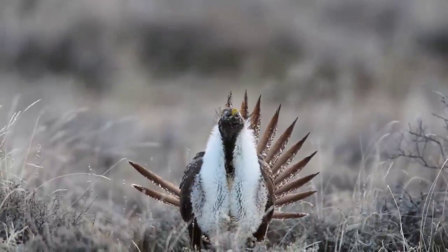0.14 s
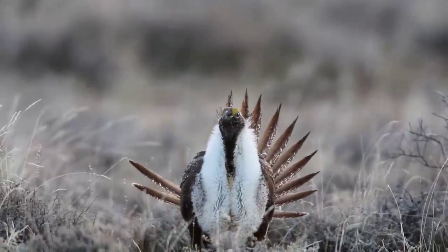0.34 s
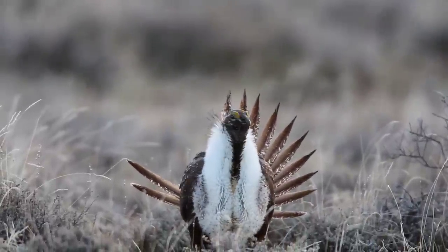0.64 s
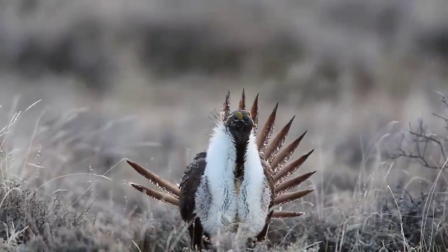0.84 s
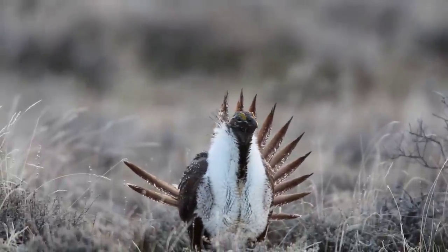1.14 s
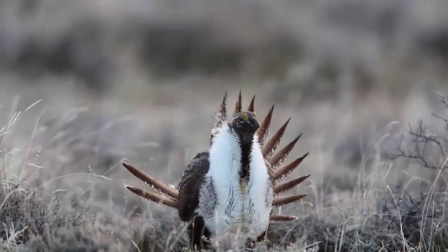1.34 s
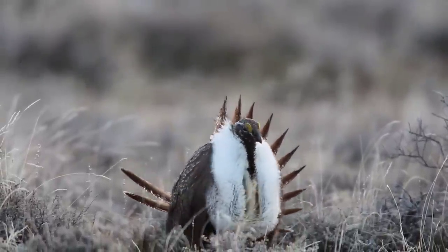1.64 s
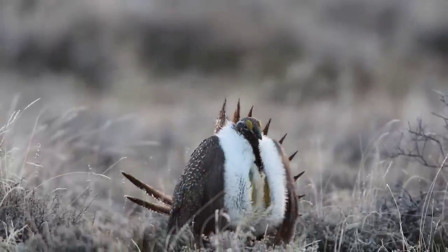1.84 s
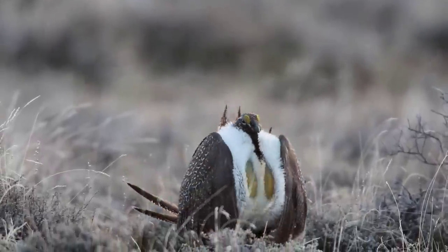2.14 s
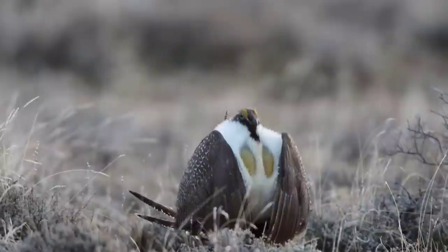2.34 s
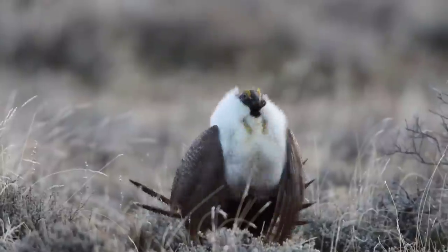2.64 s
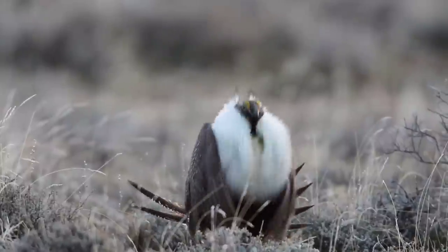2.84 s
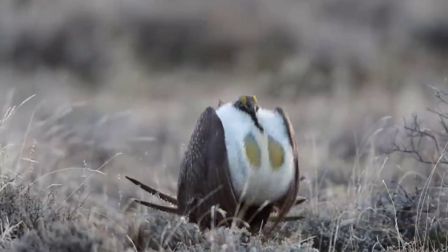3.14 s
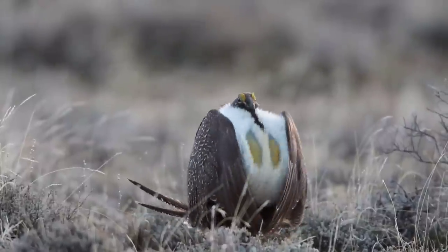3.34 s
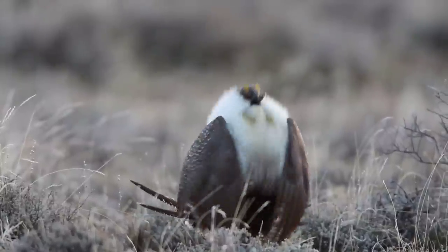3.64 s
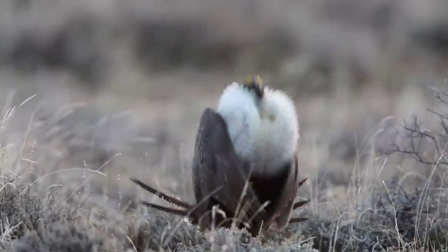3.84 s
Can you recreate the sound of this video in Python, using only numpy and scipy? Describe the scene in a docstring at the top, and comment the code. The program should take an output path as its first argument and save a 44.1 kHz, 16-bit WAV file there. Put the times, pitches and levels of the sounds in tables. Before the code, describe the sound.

A displaying grouse gives two hollow pops around a quick whistle, later feathery swishes and a rasp

```python
"""A pop, a quick whistle and another pop open the scene: a sage-grouse displays on open grassland.
Its air sacs are ringing modes and hollow sliding tones. Later its wings swish over the breast feathers as
dense noise grains, with two rising rasps of roughened tone and low sac throbs. A lark chirps far off in
gliding tones, wind rumbles as shaped noise, the camera mount is bumped and rattles, and the recorder hisses."""
import sys
import numpy as np
from scipy import signal
from scipy.fft import rfft, irfft
from scipy.io import wavfile
from scipy.ndimage import uniform_filter1d

SR = 44100
rng = np.random.default_rng(int(sys.argv[2]) if len(sys.argv) > 2 else 0)


def store_wav(level_fs):
    """Save 16-bit WAV to argv[1]."""
    pcm = np.round(np.clip(np.atleast_2d(level_fs), -1, 1) * 32767)
    wavfile.write(sys.argv[1], SR, pcm.T.astype(np.int16))


N = 176400  # four seconds of samples
TIME_S = np.arange(N) / SR


def amp(db):
    """Turn decibels into a gain."""
    return 10 ** (np.asarray(db) / 20)


def unit(x):
    """Scale a sound to an rms of 1."""
    return x / np.sqrt(np.mean(x ** 2) + 1e-20)


def curve(points, left=None, right=None):
    """Join (time, value) points with straight lines over the whole scene."""
    times_s, values = np.transpose(points)
    return np.interp(TIME_S, times_s, values, left=left, right=right)


def at_hz(points, hz):
    """Read a spectrum table, with straight lines between points on a log pitch scale."""
    table_hz, values = np.transpose(points)
    return np.interp(np.log(hz + 1), np.log(table_hz), values)


def drift(rate_hz):
    """Slow random wander of rms 1: noise through two equal low-pass poles."""
    r = np.exp(-2 * np.pi * rate_hz / SR)
    noise = rng.standard_normal(N + SR)
    # the first second lets the filter settle
    return unit(signal.lfilter([1], [1, -2 * r, r * r], noise)[SR:])


def coloured(db_of_hz):
    """White noise reshaped to a given spectrum."""
    hz = np.arange(N // 2 + 1) * SR / N
    return irfft(rfft(rng.standard_normal(N)) * amp(db_of_hz(hz)), N)


def filtered(x, order, hz, kind="low"):
    """Smooth Butterworth filter."""
    return signal.lfilter(*signal.butter(order, hz, kind, fs=SR), x)


def ring(x, hz, t60_s):
    """A resonance: a unit click sets going a dying sine that starts near height 1."""
    r = amp(-60 / (t60_s * SR))
    w = 2 * np.pi * hz / SR
    return signal.lfilter([0, np.sin(w)], [1, -2 * r * np.cos(w), r * r], x + 1e-18)


def glide(rows, rough=0, width_hz=100):
    """A tone follows pitch and level points; roughness turns part of it into narrow noise."""
    times_s, hz, db = np.transpose(rows)
    edge = np.clip(np.minimum(TIME_S - times_s[0], times_s[-1] - TIME_S) / .002, 0, 1)
    pitch_hz = uniform_filter1d(np.interp(TIME_S, times_s, hz), size=90)  # rounds the corners
    wave = np.exp(2j * np.pi * np.cumsum(pitch_hz) / SR)
    if rough:
        rough = min(rough, 1)
        noise = drift(width_hz) + 1j * drift(width_hz)
        wave = wave * (np.sqrt(1 - rough) + np.sqrt(rough / 2) * noise)
    return np.sqrt(2) * wave.real * edge * amp(np.interp(TIME_S, times_s, db))


def tones(rows):
    """Soft puffs of tone: a smooth rise, a bell-shaped fall and a pitch sliding from start to end."""
    out = np.zeros(N + SR)
    t = np.arange(SR // 3) / SR
    for start_s, rise_s, fall_s, start_hz, end_hz, peak_db in rows:
        rise = np.sin(np.pi / 2 * t / rise_s) ** 2
        fall = np.exp(-((t - rise_s) / fall_s) ** 2)
        shape = np.where(t < rise_s, rise, fall)
        hz = end_hz + (start_hz - end_hz) * np.clip(1 - t / (rise_s + 2 * fall_s), 0, 1)
        wave = amp(peak_db) * shape * np.sin(2 * np.pi * np.cumsum(hz) / SR)
        i = int(start_s * SR)
        out[max(i, 0):i + len(t)] += wave[max(-i, 0):]  # a negative start joins the tone midway
    return out[:N]


def knocks(events, modes, burst_s):
    """Each event is a short dying burst of contacts, striking every mode with its own strength."""
    out = np.zeros(N)
    size = int(2 * burst_s * SR) + 1
    fade = np.exp(-np.arange(size) / (burst_s * SR)) / np.sqrt(size)
    for hz, mode_db, t60_s in modes:
        strikes = np.zeros(N)
        luck = rng.standard_normal((len(events), size + 1))
        for (start_s, event_db, tilt_db), draw in zip(events, luck):
            i = int(start_s * SR)
            strike_db = event_db + mode_db - 5.5 + tilt_db * np.log2(hz / 2000) + 1.8 * draw[0]
            strikes[i:i + size] = amp(strike_db) * draw[1:] * fade
        out += ring(strikes, hz, t60_s)
    return out


# Spectrum of far field and hiss: pitch_hz [Hz], relative_level_db [dB per Hz]
AIR_SPECTRUM = [(80, -2.5), (119, -0.5), (189, -3.5), (257, -7), (290, -7.5), (330, -8.5), (420, -11.5),
                (521, -13), (1150, -17.5), (2500, -19), (5000, -20.5), (6800, -23), (7500, -26.5),
                (8000, -32.5), (8700, -26), (10000, -23), (12500, -23.5), (14300, -25.5), (15400, -31),
                (15800, -31.5)]
# How the stereo difference compares with the centre: pitch_hz [Hz], side_minus_mid_db [dB]
AIR_WIDTH = [(20, -30), (40, -22), (90, -22), (180, -17), (380, -9), (700, -3.5), (1290, -2.5),
             (2380, -2.5), (4400, -2.2), (8120, -1.2), (15000, -1.2)]
AIR_DB = -51  # rms of the centre part before the murmur moves it


def air_noise():
    """Far-field noise and hiss, widest in the treble; returns the stereo noise and its centre part."""
    def spectrum(hz):
        return at_hz([(40, -38)] + list(AIR_SPECTRUM), hz)

    mid = coloured(spectrum)
    side = coloured(lambda hz: spectrum(hz) + at_hz(AIR_WIDTH, hz))
    gain = amp(AIR_DB) / np.std(mid)
    return gain * (mid + side * [[1], [-1]]), gain * mid


# Gain of the low far-field noise before its random waver: time_s [s], gain_db [dB]
MURMUR_GAIN = [(0, 7.5), (.3, -1.5), (.8, 0), (1.18, 0.5), (1.31, -0.5), (1.6, -4.5), (1.85, -2.5),
               (2.05, 5), (2.3, 6), (2.5, 2), (2.85, 3), (3.05, 1), (3.3, -1), (3.42, 7.5), (3.6, -1),
               (3.75, 6), (4, 5)]
MURMUR_WAVER_DB, MURMUR_HZ = 2.34, 404


def murmur(mid):
    """The change that makes the low part of the centre noise swell and waver."""
    low = signal.filtfilt(*signal.butter(1, MURMUR_HZ, fs=SR), mid)
    gain = amp(curve(MURMUR_GAIN) + MURMUR_WAVER_DB * drift(8.2))
    return low * (gain - 1)  # minus the low noise already present


HUM_HZ, HUM_DB, HUM_END_S = 292.6, -61.5, 2.3  # middle pitch, middle peak level, end of its fade


def hum():
    """A faint far hum with wandering level and phase, fading out at its end."""
    level = amp(HUM_DB + 0.98 * drift(8.3))
    wave = np.sin(2 * np.pi * HUM_HZ * TIME_S + 1.2 * drift(4.4))
    return level * wave * np.clip((HUM_END_S - TIME_S) / 0.26, 0, 1)


# Thin steady tones of the electronics: pitch_hz [Hz], level_db [dB rms]
WHINE_TONES = [(15552, -88), (15617, -85), (15676, -80), (15735, -87)]


def whine():
    """Steady high sine waves from the electronics."""
    return sum(np.sqrt(2) * amp(db) * np.sin(2 * np.pi * hz * TIME_S) for hz, db in WHINE_TONES)


def air():
    """The steady background: noise, murmur, whine and hum together."""
    both, mid = air_noise()
    return both + murmur(mid) + whine() + hum()


# Strength of wind shaking the mount, before random wander: time_s [s], level_db [dB]
WIND_LEVEL = [(0, -39.5), (.35, -44), (.6, -40.5), (1.0, -44.5), (1.4, -46), (1.851, -40.5), (1.95, -33.5),
              (2.15, -34.5), (2.3, -29.5), (2.45, -33), (2.6, -40), (2.7, -35), (2.9, -42.5), (3.2, -41.5),
              (3.6, -43.5), (3.85, -40.5), (4, -44)]
# The mount rings near 12 and 36 Hz: pitch_hz [Hz], relative_level_db [dB per Hz]
WIND_SPECTRUM = [(6, -14), (11, 1), (15, 0), (21, -13), (28, -7), (36, 1), (45, -6), (60, -11), (90, -22),
                 (150, -38)]
WIND_WANDER_DB = .5


def wind():
    """Low noise coloured by the mount's resonances, evened out and then given its level curve."""
    spectrum = [(2, -40)] + list(WIND_SPECTRUM) + [(300, -80)]
    rumble = coloured(lambda hz: at_hz(spectrum, hz))
    power = uniform_filter1d(uniform_filter1d(rumble ** 2, size=6000), size=6000)
    even = unit(rumble / np.sqrt(power))
    return even * amp(curve(WIND_LEVEL) + WIND_WANDER_DB * drift(7.3))


# Faint far notes of other birds:
# start_s [s], rise_s [s], fall_s [s], start_hz [Hz], end_hz [Hz], peak_db [dB]
FAR_BIRD_NOTES = [(2.115, 0.021, 0.022, 219, 237, -39), (2.165, .02, .01, 212, 214, -39.5),
                  (3.05, .012, .012, 2210, 2150, -55.5), (3.39, 0.0048, 0.0034, 1140, 1150, -49),
                  (3.412, .01, 0.0048, 880, 950, -48), (3.57, .02, 0.024, 1370, 1310, -51.5)]


def far_birds():
    """Other birds give faint, soft, sliding tones."""
    return tones(FAR_BIRD_NOTES)


# Distant lark, one list per note: time_s [s], pitch_hz [Hz], level_db [dB rms]
LARK_NOTES = [
    [(1.581, 5600, -60), (1.587, 5250, -52), (1.590, 5600, -53), (1.597, 4900, -50), (1.604, 5600, -47),
     (1.610, 4200, -47), (1.616, 5150, -42), (1.619, 4900, -39.5), (1.622, 3500, -47)],
    [(1.632, 5750, -56), (1.636, 5550, -44), (1.641, 5280, -48), (1.646, 5050, -38), (1.655, 4350, -48),
     (1.660, 3100, -50)],
    [(1.706, 5650, -66), (1.712, 5600, -57), (1.716, 5650, -60), (1.721, 5750, -47.5), (1.727, 5700, -66)],
    [(1.733, 5300, -58), (1.737, 4200, -53), (1.741, 3430, -54), (1.745, 2900, -68)],
    [(1.769, 3600, -66), (1.772, 3850, -53), (1.775, 4200, -66)],
    [(1.777, 5700, -66), (1.781, 5800, -50), (1.786, 5900, -66)],
]


def lark():
    """Each chirp is a pure tone with quick turns of pitch and level."""
    return sum(glide(note) for note in LARK_NOTES)


# Mount bumps: start_s [s], knock_strength_db [dB], knock_hz [Hz], sway_peak_db [dB], sway_hz [Hz]
MOUNT_BUMPS = [(.186, -24, 140, -22.5, 45.3), (1.879, -20, 146, -19.5, 49.6),
               (1.945, -48, 140, -27.5, 51.7), (2.045, -22.5, 137, -23, 41.2),
               (2.260, -24.5, 190, -29, 36.7)]
BUMP_T60_S = .045
SWAY_LAG_S, SWAY_RISE_S, SWAY_FALL_S = 0.0112, 0.022, .03


def bumps():
    """A dulled click rings the mount, which then sways a few low cycles."""
    out = tones([(start_s + SWAY_LAG_S, SWAY_RISE_S, SWAY_FALL_S, sway_hz, sway_hz, sway_db)
                 for start_s, _, _, sway_db, sway_hz in MOUNT_BUMPS])
    for start_s, knock_db, knock_hz, _, _ in MOUNT_BUMPS:
        click = np.zeros(N)
        click[int(start_s * SR)] = -amp(knock_db)
        out += ring(filtered(click, 2, 2 * knock_hz), knock_hz, BUMP_T60_S)
    return out


# Small clicks of the camera: start_s [s], strength_db [dB], brightness [dB per octave]
CAMERA_CLICKS = [(.19, -35.5, 2), (.202, -41.5, -6), (.686, -38, -3), (1.799, -45.5, -8), (2.051, -35, -6),
                 (2.058, -28.5, 0), (2.082, -25.5, 1), (2.095, -40, -4), (2.125, -30.5, -1.8),
                 (2.138, -41, -3), (2.19, -31, 4), (2.211, -36, 6.5), (2.695, -49.5, -10.5),
                 (2.785, -48, -10), (3.22, -48.5, -10.5)]
# Resonances of the clicks: pitch_hz [Hz], relative_level_db [dB], t60_s [s to fall 60 dB]
CAMERA_MODES = [(595, -2.5, .015), (1000, 6, 0.0087), (1650, 3, 0.0083), (2240, 0, 0.0088),
                (2640, -2, 0.0056), (3250, 5.5, 0.0086), (3950, -9, .008), (4800, -7.5, 0.0071)]


def camera_clicks():
    """Short bursts of contacts ring the camera's resonances."""
    return knocks(CAMERA_CLICKS, CAMERA_MODES, burst_s=.004)


# Grit rustling on the camera body between clicks: time_s [s], level_db [dB]
RUSTLE_LEVEL = [(1.93, -80), (1.95, -56), (1.98, -72), (2.04, -67), (2.06, -56), (2.1, -61), (2.12, -58),
                (2.14, -58.5), (2.17, -63), (2.2, -56), (2.23, -67), (2.32, -66), (2.4, -80)]
RUSTLE_BAND_HZ, RUSTLE_PER_S = (400, 2160), 900


def rustle():
    """Sparse random grains, dulled by a gentle band filter."""
    grains = rng.standard_normal(N) * (rng.random(N) < RUSTLE_PER_S / SR)
    dull = unit(filtered(grains, 1, RUSTLE_BAND_HZ, "band"))
    return dull * amp(curve(RUSTLE_LEVEL, left=-120, right=-120))


# Loudness of wing on breast: time_s [s], level_db [dB rms]
SWISH_LEVEL = [(2.3, -70), (2.55, -63), (2.64, -60.5), (2.7, -63), (2.75, -53), (2.79, -58.5), (2.82, -72),
               (2.92, -61), (2.98, -57.5), (3.03, -57), (3.07, -76), (3.18, -59.5), (3.27, -64),
               (3.4, -60.5), (3.5, -54.5), (3.58, -52.5), (3.66, -47), (3.71, -50), (3.76, -42),
               (3.8, -45.5), (3.85, -50), (3.875, -63), (3.93, -57.5), (4, -55.5)]
# Feather resonances: pitch_hz [Hz], width_hz [Hz], relative_level_db [dB]
FEATHER_MODES = [(1900, 720, -2.5), (2460, 620, 1.5), (3080, 300, 2), (3670, 410, -3.5),
                 (4600, 1400, -10.5)]
BRISTLES_PER_S = 9000


def swish():
    """Dense bristle scratches pass through the feather resonances."""
    grains = rng.standard_normal(N) * (rng.random(N) < BRISTLES_PER_S / SR)
    body = np.zeros(N)
    for k, (hz, width_hz, db) in enumerate(FEATHER_MODES):
        resonance = unit(ring(grains, hz, 2.2 / width_hz))
        body += amp(db) * resonance * (-1) ** k  # neighbours take opposite signs
    return unit(body) * amp(curve(SWISH_LEVEL, left=-90))


# Rising rasp closing each wing stroke, one list each: time_s [s], centre_hz [Hz], level_db [dB]
RASP_GLIDES = [
    [(2.745, 2500, -66), (2.76, 3230, -53), (2.772, 4520, -53), (2.78, 5600, -64)],
    [(3.778, 1700, -57), (3.792, 1895, -49), (3.804, 2240, -41), (3.815, 3007, -30), (3.828, 4250, -45.5),
     (3.84, 5600, -64), (3.85, 6200, -64)],
]
RASP_ROUGH, RASP_WIDTH_HZ = .55, 160  # noise share of the power (0 to 1), rate of its wander


def rasps():
    """Rising tones are partly broken into narrow noise."""
    return sum(glide(rasp, RASP_ROUGH, RASP_WIDTH_HZ) for rasp in RASP_GLIDES)


# Hollow tones of the air sacs and throat:
# start_s [s], rise_s [s], fall_s [s], start_hz [Hz], end_hz [Hz], peak_db [dB]
SAC_NOTES = [(-.01, 0.0085, 0.016, 402, 249, -33), (.042, 0.0018, 0.014, 196, 170, -25),
             (.229, 0.0048, 0.0047, 306, 367, -21.5), (.243, 0.0057, .008, 310, 260, -34),
             (.247, .004, 0.006, 910, 750, -45), (.229, 0.0011, 0.0031, 2150, 2100, -36.5),
             (.236, 0.0033, 0.0075, 2096, 2160, -42), (2.78, 0.0058, 0.043, 144, 129, -31.5),
             (2.775, 0.0056, 0.01, 608, 523, -49.5), (3.79, 0.023, 0.0048, 602, 558, -42),
             (3.805, 0.02, 0.046, 147.3, 133, -31), (3.965, 0.026, .05, 344.5, 340, -32)]


def sac_tones():
    """The air sacs and throat give short hollow tones and low throbs."""
    return tones(SAC_NOTES)


# Whistle between the pops: time_s [s], pitch_hz [Hz], level_db [dB rms]
WHISTLE_GLIDE = [(.046, 1120, -61), (.055, 1170, -46), (.075, 1463, -51), (.085, 1750, -42.5),
                 (.098, 2460, -52), (.107, 2657, -47), (.112, 2450, -42), (.119, 1810, -43),
                 (.127, 1087, -53), (.135, 750, -70)]


def whistle():
    """One pure tone sweeps up and drops back."""
    return glide(WHISTLE_GLIDE)


# Sac snaps: start_s [s], strength_db [dB], brightness [dB per octave]
SAC_POPS = [(.038, -16, -3.5), (.229, -25, -2)]
# Resonances of the snaps: pitch_hz [Hz], relative_level_db [dB], t60_s [s to fall 60 dB]
SAC_POP_MODES = [(1100, -6, .009), (1500, 0, .012), (1800, 0, .012), (2200, -5, .008), (2550, -4, .01),
                 (3100, -5, .008), (3600, -4, .008), (4300, -7, .006)]
SNAP_CUT_HZ = 850  # the snaps carry little below this


def pops():
    """Each sac snap is a tiny burst ringing many short modes, with its lows filtered away."""
    return filtered(knocks(SAC_POPS, SAC_POP_MODES, burst_s=.003), 2, SNAP_CUT_HZ, "high")


ECHO_DB, ECHO_T60_S = -13, .08


def scatter(x):
    """Scatter off the brush adds a faint diffuse tail of fading noise."""
    t = np.arange(SR // 5) / SR
    tail = rng.standard_normal(len(t)) * amp(-60 * t / ECHO_T60_S) * (t > .003)
    tail /= np.sqrt(np.sum(tail ** 2))
    return x + amp(ECHO_DB) * signal.fftconvolve(x, tail)[:N]


def scene():
    """Everything distinct sits at the centre; only the background noise is wide."""
    background = air() + wind()
    camera = bumps() + camera_clicks() + rustle()
    echoing = scatter(lark() + rasps() + whistle() + pops())
    dry_birds = far_birds() + swish() + sac_tones()
    return background + camera + echoing + dry_birds


CUTOFF_HZ = 15760
OFFSET = .0357  # the converter sits off zero, opposite ways in the two channels


def record(dry):
    """The top is cut steeply and each channel gets a constant offset."""
    steep = signal.ellip(12, .5, 70, CUTOFF_HZ, fs=SR, output="sos")
    return signal.sosfilt(steep, dry) + OFFSET * np.array([[-1], [1]])


dry = scene()
out = record(dry)
store_wav(out)
```